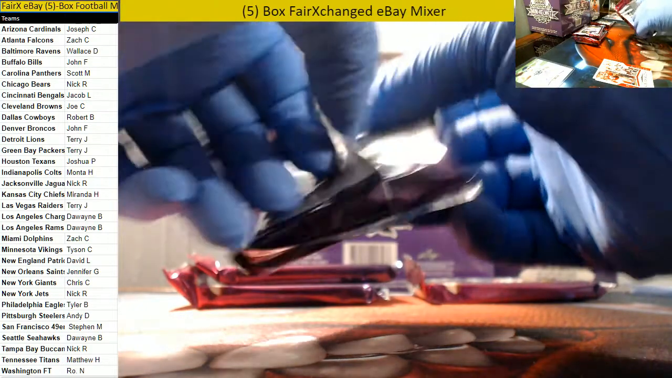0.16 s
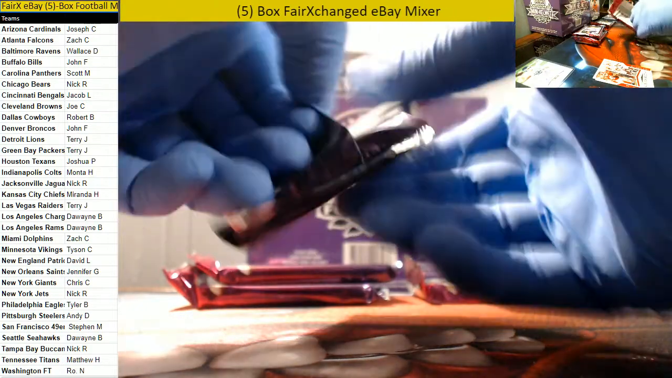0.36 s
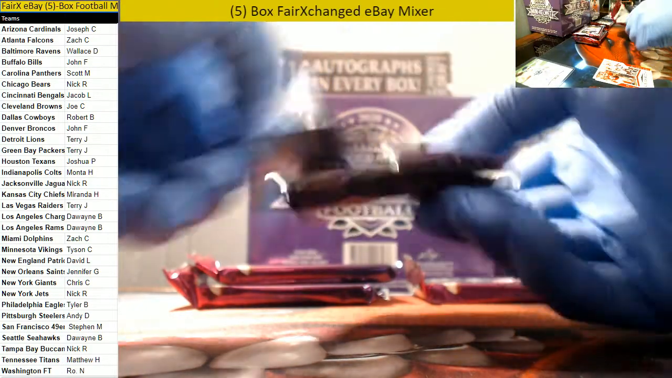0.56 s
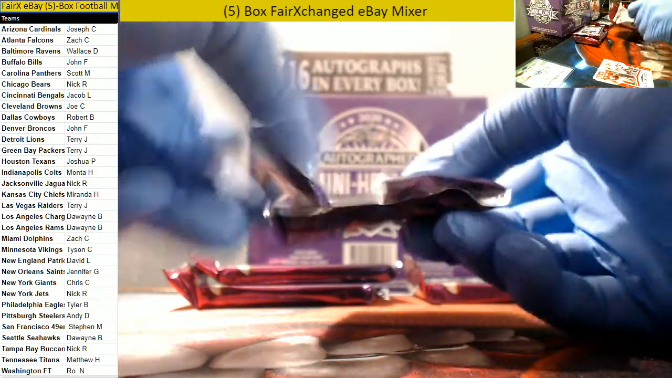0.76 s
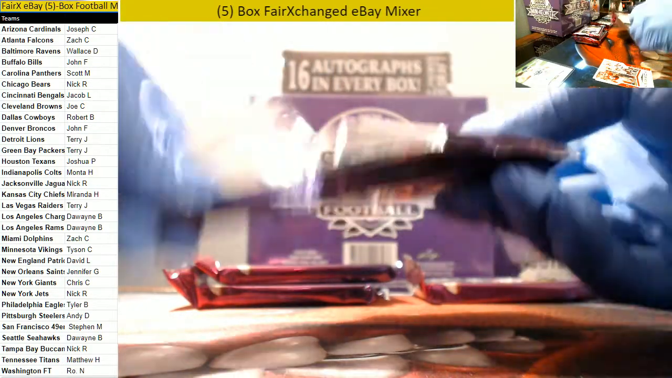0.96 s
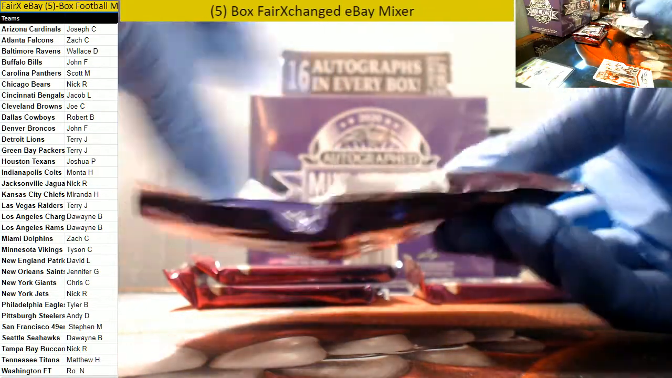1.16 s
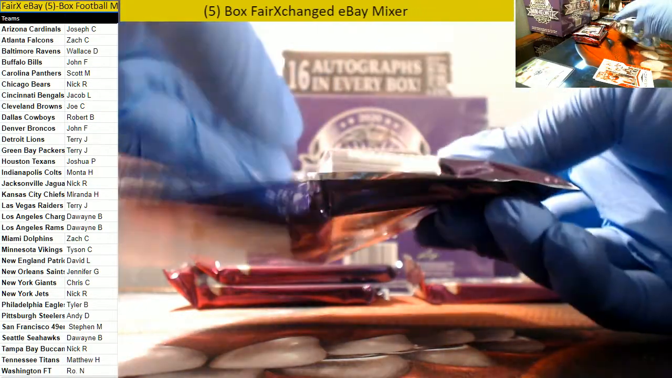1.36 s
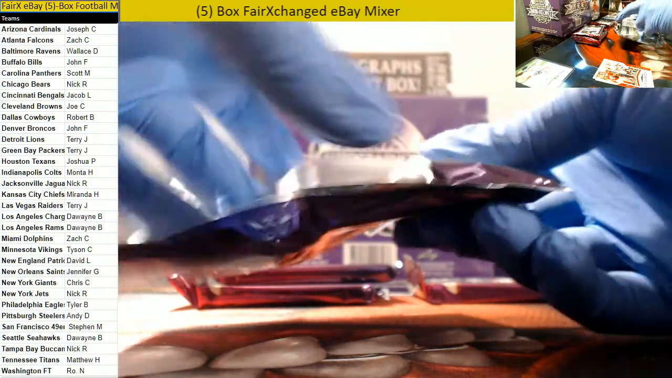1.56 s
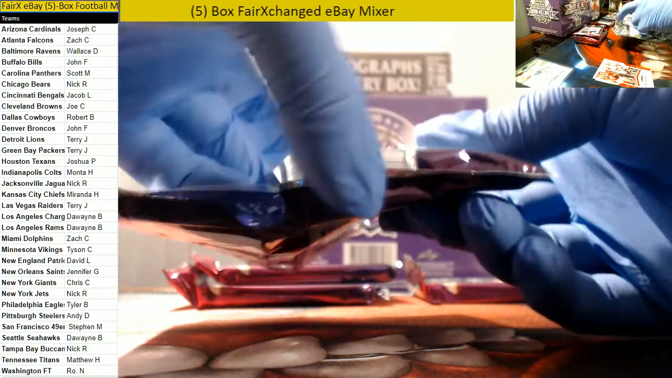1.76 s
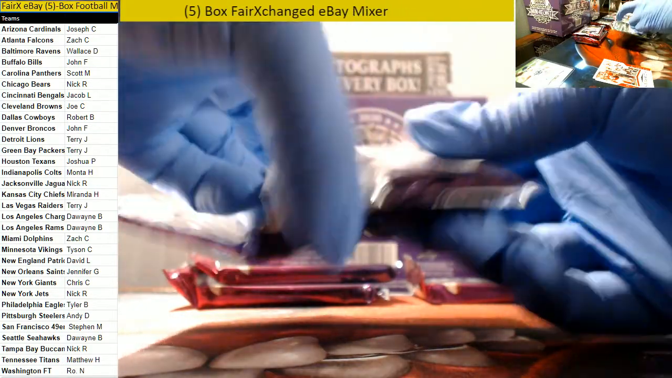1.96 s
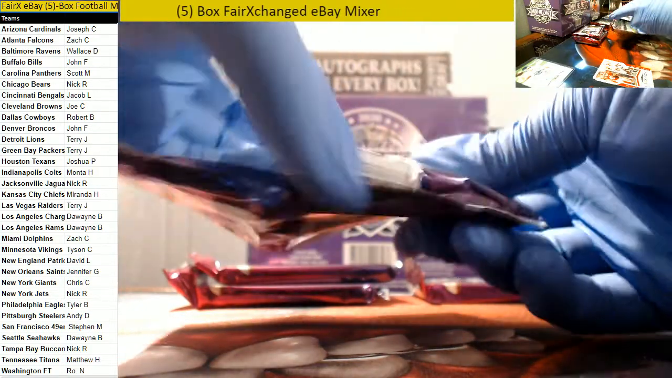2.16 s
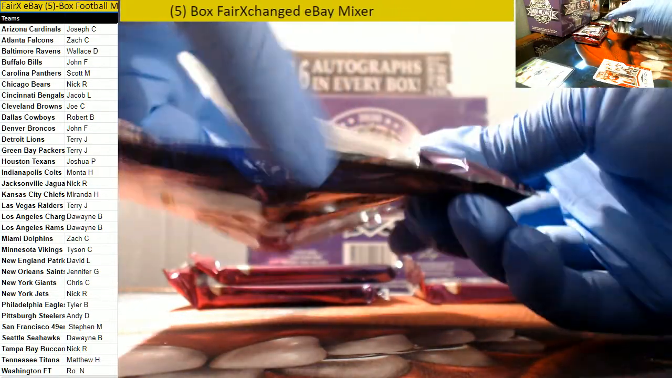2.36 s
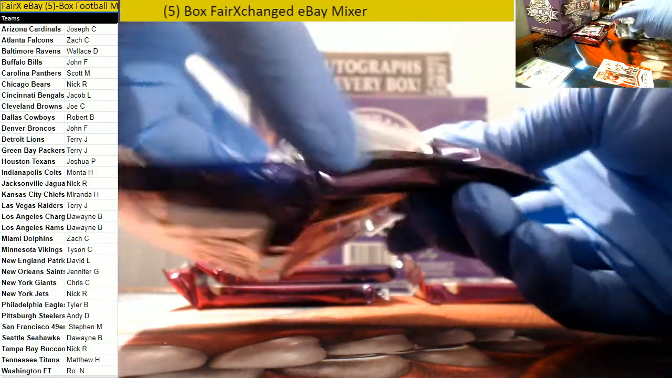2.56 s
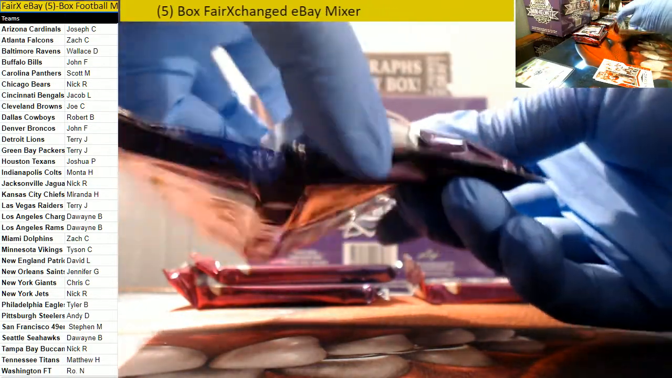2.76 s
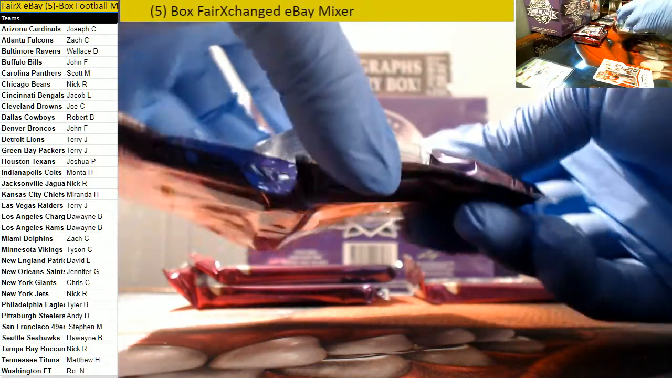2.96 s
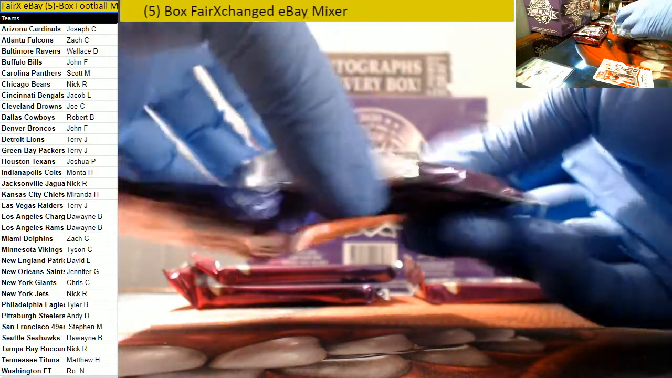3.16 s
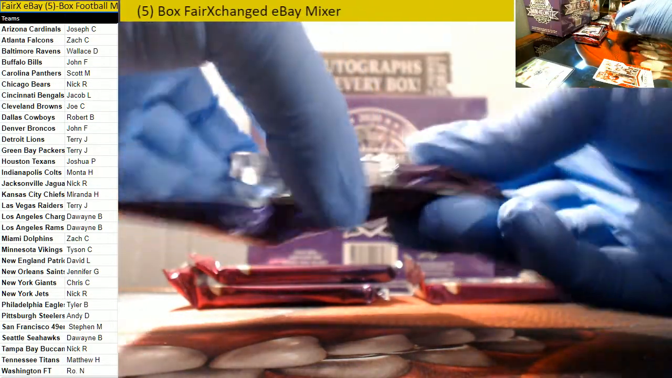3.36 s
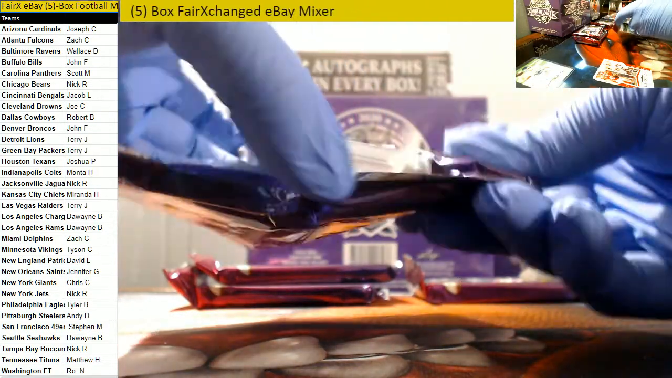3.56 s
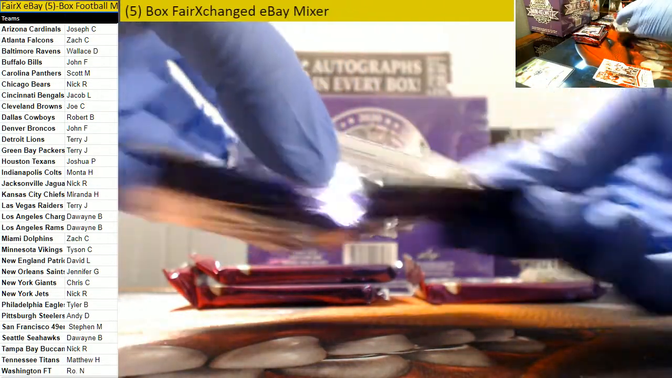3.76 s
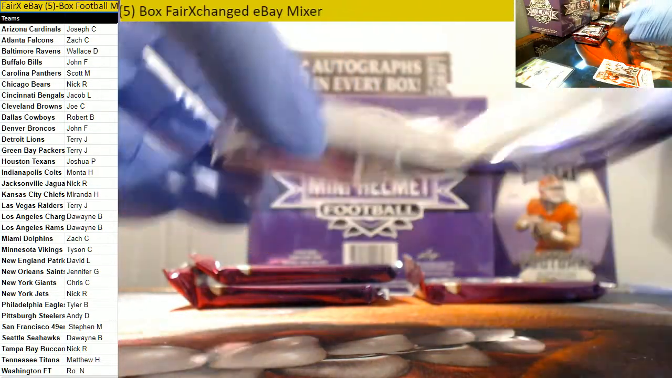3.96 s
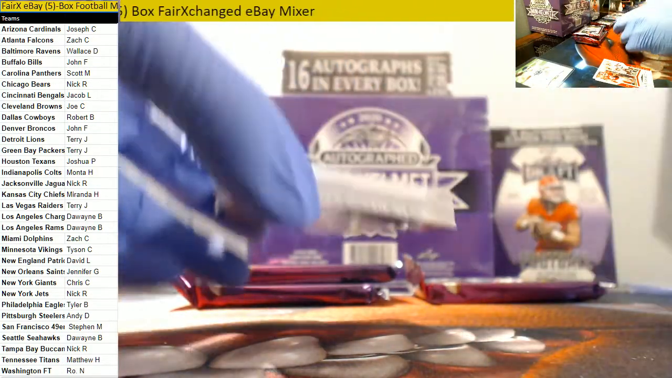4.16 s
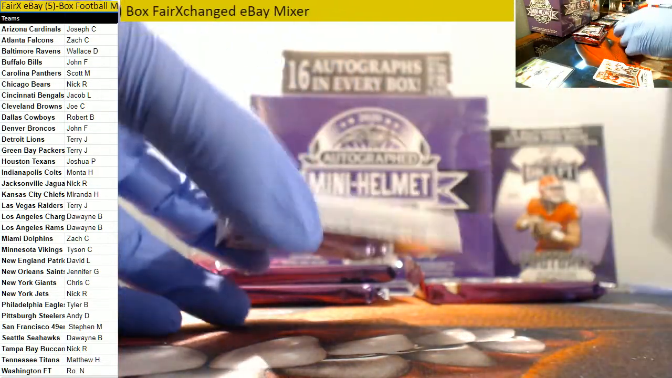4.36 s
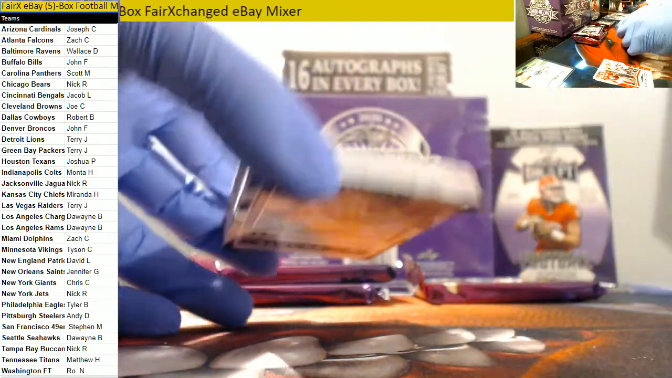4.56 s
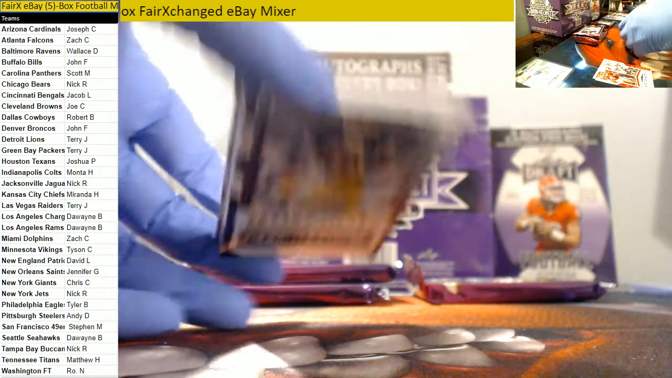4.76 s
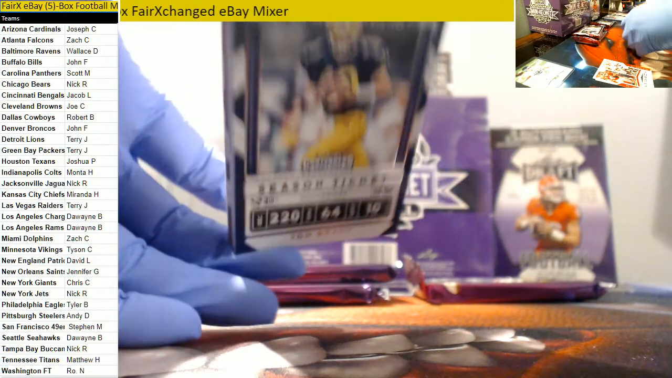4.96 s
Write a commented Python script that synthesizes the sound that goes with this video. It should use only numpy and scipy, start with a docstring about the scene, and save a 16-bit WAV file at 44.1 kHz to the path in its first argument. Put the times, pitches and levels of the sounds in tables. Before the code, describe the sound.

Gloved hands tear a foil trading card pack very close to a desk microphone. A few small snaps lead into a dense, loud rip within the first half second, then another sharp burst, overloading with low thumps. Afterwards come lighter scattered crinkles, a modest flurry past three seconds, a soft set-down thud, and near-quiet card movement. Small room, faint fan, sound leaning left and dull on top.

```python
"""Small foil snaps come first, as gloved hands tear open a card pack close to a desk microphone and work the cards out.
Creases snap and set short resonances ringing; foil and cards rub as a dense crackle of tiny noise grains.
Sliding cards hiss, fingers thud, the stretched wrapper twangs, and low thumps mark overloads of the left side.
A small room answers over a faint fan; the sound leans left, is dull above 8 kHz and clips on its loudest peaks."""
import sys
import numpy as np
from scipy import signal
from scipy.fft import rfft, irfft, next_fast_len
from scipy.io import wavfile
from scipy.ndimage import uniform_filter1d

SR = 44100
rng = np.random.default_rng(int(sys.argv[2]) if len(sys.argv) > 2 else 0)


def persist_wave(psi):
    """Save psi, clipped to +-1, as 16-bit WAV."""
    counts = np.round(np.clip(psi, -1, 1) * 32767).astype(np.int16)
    wavfile.write(sys.argv[1], SR, np.atleast_2d(counts).T)


N = 220708  # length in samples, about 5 s

# Levels are what each layer starts from; scene() adds a gain to some layers.
# clearest creases and card edges: start_s, crack level_db, crack pitch_hz, panel level_db
CREASE_SNAPS = [(.021, -30.5, 3350, -28.5), (.042, -29.5, 2070, -30.5), (.214, -28.5, 3320, -45),
                (.222, -24.5, 3870, -29), (0.254, -38, 2260, -38), (.271, -33, 3900, -40),
                (.275, -22.5, 4630, -33), (.291, -25, 4730, -21.5), (.295, -18.5, 4430, -37),
                (.304, -35, 2440, -18.5), (.314, -11.5, 3150, -17), (.324, -18, 4100, -16.5),
                (0.341, -25, 3150, -22), (.35, -12, 2130, -17), (.363, -18, 3240, -20.5),
                (0.368, -23, 2450, -12.5), (.381, -13.5, 2320, -18), (.394, -20.5, 3010, -12.5),
                (0.4, -27, 2730, -21), (0.407, -24, 3700, -17), (.427, -14, 3730, -16.5),
                (0.436, -21, 2820, -12.5), (0.461, -21, 3940, -15.5), (0.509, -29.5, 2390, -28),
                (0.521, -22, 4600, -36), (0.527, -30.5, 2860, -47), (.553, -29.5, 3700, -20.5),
                (0.679, -17.5, 3470, -22), (0.695, -25, 3640, -28), (.729, -24.5, 2650, -25),
                (.75, -27.5, 2040, -26), (0.759, -24.5, 3600, -24), (.77, -16, 3640, -20),
                (.776, -14, 3170, -37), (0.783, -21, 3570, -8), (0.842, -30.5, 3700, -47),
                (.888, -30.5, 3580, -37), (.899, -31, 3350, -34.5), (0.934, -28, 3540, -56),
                (.965, -26.5, 3660, -36), (.991, -31, 3650, -39), (1.039, -29.5, 4260, -32.5),
                (1.133, -33.5, 2650, -30), (1.149, -34.5, 3000, -54), (1.183, -27.5, 5000, -30),
                (1.206, -28.5, 4000, -32), (1.232, -25.5, 3770, -33), (1.259, -20.5, 3700, -24.5),
                (1.278, -17.5, 3300, -15.5), (1.509, -33.5, 2880, -35.5), (1.558, -25.5, 4800, -33.5),
                (1.604, -29, 3600, -30.5), (1.633, -55, 2400, -38), (1.689, -37, 2500, -42),
                (1.765, -32.5, 5470, -41.5), (1.777, -35.5, 2730, -44), (1.833, -31.5, 3960, -56),
                (1.991, -47, 4300, -51), (2.049, -42, 2740, -45), (2.113, -39, 2760, -35.5),
                (2.157, -34, 2930, -38), (2.17, -33.5, 2870, -36), (2.248, -49, 2720, -30.5),
                (2.269, -34, 3550, -47), (2.302, -19.5, 3370, -28), (2.344, -29, 3120, -34),
                (2.353, -21, 4000, -29), (2.455, -28.5, 3150, -27.5), (2.474, -31, 1980, -37.5),
                (2.582, -32, 3180, -35), (2.6, -27.5, 2520, -51), (2.669, -43.5, 2280, -37),
                (2.772, -35, 2780, -35), (2.824, -36, 2380, -35), (2.886, -38, 2180, -35),
                (2.908, -32.5, 2640, -39), (2.917, -26, 2620, -30), (3.05, -34.5, 2160, -43),
                (3.072, -23.5, 3300, -27), (3.133, -32, 3500, -41.5), (3.154, -36, 2480, -37),
                (3.187, -42, 3500, -39.5), (3.229, -38.5, 2230, -47), (3.282, -27, 2550, -28),
                (3.295, -40, 2900, -36.5), (3.316, -29, 3450, -28.5), (3.326, -34, 2850, -44),
                (3.335, -31, 3040, -50), (3.386, -25.5, 2310, -34), (3.396, -33, 3770, -43),
                (3.428, -22, 5200, -34.5), (3.478, -28.5, 2340, -39.5), (3.553, -32, 3300, -35),
                (3.574, -27, 3700, -52), (3.613, -28, 3180, -49), (3.624, -22.5, 3800, -42),
                (3.658, -19.5, 2740, -27), (3.681, -24, 3300, -33), (3.714, -37, 3540, -55),
                (3.962, -27.5, 3320, -28.5), (3.974, -34, 2480, -41.5), (4.045, -47, 2050, -46),
                (4.119, -40, 2740, -42), (4.143, -46, 2960, -39.5), (4.178, -41, 2850, -63),
                (4.206, -35, 3660, -45), (4.225, -26.5, 3000, -56), (4.364, -48.5, 2310, -55),
                (4.413, -39.5, 4170, -39.5), (4.751, -34, 3320, -37.5)]
# main tones of a crease: multiple of its pitch (ratio), level_db
CREASE_TONES = [(.6, -4.5), (.95, 2.5), (1.55, -2)]
# typical pitch of the panel beside a crease: time_s, pitch_hz
PANEL_PITCH = [(0, 822), (1.0, 930), (1.25, 736), (2.3, 616), (3.1, 740), (4.0, 860)]
PANEL_SCATTER = 0.12  # spread of pitch from panel to panel (log ratio)
# where the pack is held: time_s, lean to the right level_db
HOLD_LEAN = [(0, -3), (1.5, 0.5), (3.2, 1), (5, -3.5)]
LEAN_SCATTER_DB = 4.2  # spread from crease to crease
# time when only card edges tick: start_s, end_s
BARE_CARDS_TIME = (4.0, 4.5)
# tone of a ticking card edge: pitch_hz, level_db
CARD_EDGE_TONE = [(900, -2), (2000, -1.5), (3300, 3), (4600, 2.5), (6000, -8.5), (8000, -2.5)]
# small creases give way at random, louder under a stronger pull
CRINKLE_UNTIL_S = 3.75
CRINKLE_DB, CRINKLE_GROWS, CRINKLE_SCATTER_DB = -13.5, 0.7, 1.5  # at 0 dB effort; dB per dB of effort; spread
CRINKLE_HZ, CRINKLE_PANEL_DB = 3070, 3  # middle crack pitch; panel level against the crack

# pulls, tears and rubs: hardest_s, effort level_db, flutter over effort level_db, build_up_s, release_s
HAND_PULLS = [(.04, -39.5, 0.5, 0.15, 0.054), (0.394, -11, -1.5, .07, 0.094), (.582, -24, -6, .08, 0.022),
              (.69, -40.5, 3.5, 0.57, 0.12), (0.78, -9, -0.5, 0.062, 0.04), (.83, -40, 1, .1, 0.6),
              (1.286, -31.5, -3.5, 0.036, 0.088), (1.8, -47, 2, 0.5, 0.15), (2.038, -41.5, 5.5, 0.27, 0.13),
              (2.175, -48.5, 10, 0.035, 0.09), (2.291, -39, 5, 0.15, 0.058),
              (2.584, -44.5, 7.5, 0.02, 0.11), (2.68, -52.5, 10, .03, 0.11), (2.901, -47, 2, 0.5, 0.087),
              (3.325, -37.5, -2, 0.056, 0.35), (3.665, -28, -2.5, 0.21, 0.047),
              (3.841, -40.5, -1, 0.087, 0.035), (4.23, -41.5, -8.5, 0.033, 0.11),
              (4.65, -49, 7, 0.42, 0.13)]
SWELL_DB = 28.5  # effort gained over a build-up and lost over a release
# light grip under the pulls: time_s, effort level_db
LIGHT_GRIP = [(0, -51), (1.3, -59.5), (2.5, -58), (3.0, -64), (3.7, -44), (3.92, -68.5), (5, -76)]
SETTLE_DB, SETTLE_S = -16, 0.023  # foil settling after a snap: effort against the snap; release time
# shape of the fine crackle: pitch_hz, relative level_db (per Hz)
CRACKLE_TONE = [(530, -32), (900, -19), (1420, -6), (2350, -6.5), (2950, -9), (3360, -1), (6910, -10),
                (8000, -6), (10400, -48.5), (17600, -120)]
# shape of the loose sheet's flutter: pitch_hz, relative level_db (per Hz)
FLUTTER_TONE = [(60, -1), (170, -2), (280, 3), (420, -2.5), (700, 2), (1200, -3.5), (1600, -20),
                (3000, -21)]

# cards sliding over each other: fastest_s, half_length_s, level_db
CARD_SLIDES = [(0.572, 0.015, -24), (2.015, 0.079, -61), (2.756, 0.025, -44.5), (2.827, 0.025, -43.5),
               (3.37, 0.029, -43), (4.54, 0.12, -55.5), (4.641, 0.02, -51.5), (4.879, 0.069, -51.5)]
# shape of the glossy hiss: pitch_hz, relative level_db (per Hz)
GLOSS_TONE = [(700, -28), (1500, 1), (2300, -3), (3300, -2), (5200, 0), (7400, -2.5), (9000, -10.5)]
# fingers bumping and bending the pack: start_s, level_db, pitch_hz
FINGER_BUMPS = [(0.222, -38, 194), (0.285, -26.5, 220), (0.363, -19.5, 132), (.388, -17, 198),
                (.43, -32, 110), (0.584, -32, 125), (0.77, -29, 105), (1.19, -29.5, 142),
                (1.259, -25.5, 203), (2.154, -31.5, 146), (2.184, -36.5, 169), (2.273, -30.5, 215),
                (2.303, -30.5, 218), (2.677, -30.5, 128), (2.916, -29.5, 138), (3.313, -35, 146),
                (3.548, -36, 202), (3.662, -37, 124), (3.77, -27.5, 125), (4.539, -39.5, 160)]
# free rings of wrapper and desk: start_s, level_db, settled pitch_hz, time to fall 60 dB (fade_s)
FREE_RINGS = [(.453, -1, 720, 0.014), (.461, -18, 727, 0.11), (.77, -12.5, 351, .05),
              (1.279, -12, 722, 0.02), (1.294, -21, 593, 0.045), (2.352, -26, 432, 0.064),
              (3.773, -36.5, 32.6, 1), (3.774, -31, 260, 0.068), (3.772, -32, 417, 0.1),
              (3.772, -32, 626, 0.082), (3.772, -27.5, 840, .047), (3.964, -22, 813, 0.044)]
RING_SAG, SAG_S = 0.25, 0.0056  # share by which a ring starts sharp; time constant of its settling
# low thumps as the left side overloads on the loudest rips: middle_s, peak level_db on the left
OVERLOAD_THUMPS = [(0.368, -9), (0.406, -16.5), (0.438, -23.5), (0.771, -14), (0.782, -24)]

# how long the room's tail lasts: pitch_hz, time to fall 60 dB (fade_s)
ROOM_FADE = [(150, 0.15), (700, 0.39), (3000, 0.19), (8000, 0.07)]
# copies from desk, boxes and wall: delay_s, level_db
NEAR_ECHOES = [(.0031, -29.5), (.0049, -33), (.0097, -19.5), (0.0128, -32), (.05, -41)]
# shape of the steady air noise: pitch_hz, relative level_db (per Hz)
AIR_TONE = [(15, -39), (25, -2), (135, -7.5), (181, -5), (273, -5), (330, -11.5), (562, -12.5), (733, -15),
            (1220, -13), (1600, -23.5), (8000, -31.5), (10400, -68), (17600, -120)]
# hum lines of the fan: pitch_hz, level_db
FAN_HUM = [(53.5, -56), (124, -58), (657, -62.5)]

# right side against left: pitch_hz, level_db
RIGHT_LEVEL = [(60, -15), (900, -15), (1600, -13.5), (2800, -12), (5000, -11), (8000, -8)]
# likeness of left and right: pitch_hz, correlation (0 to 1)
SIDE_LIKENESS = [(60, 0.71), (500, 0.83), (1000, 0.4), (2000, 0.53), (4000, 0.15), (8000, 0.13)]
# microphone tone before the clipping: pitch_hz, level_db
MIC_TONE = [(100, 0), (270, 1), (450, 2.5), (650, 2), (1100, 0.5), (1450, 0), (2000, 2), (2950, -4),
            (3900, -4), (5200, -3), (6000, -3), (7000, -2)]
# microphone treble loss after the clipping: pitch_hz, level_db
MIC_TREBLE_LOSS = [(7000, 0), (7800, -9.5), (8550, -18.5), (9050, -29), (16000, -47.5)]
TOP_HZ = 16500  # nothing passes from here up


def snaps(creases, crack_db, panel_db, neighbour_db, lag):
    """A crease flips with a sharp crack, the panel beside it flaps, and two neighbouring creases tick around it."""
    foil, cards = np.zeros((2, N)), np.zeros((2, N))
    t = np.arange(SR // 25) / SR
    for s, db, hz, flap_db in creases:
        out = cards if BARE_CARDS_TIME[0] < s < BARE_CARDS_TIME[1] else foil
        flap_hz = at(PANEL_PITCH, s) * np.exp(PANEL_SCATTER * rng.standard_normal())
        lean_db = at(HOLD_LEAN, s) + LEAN_SCATTER_DB * rng.standard_normal()
        tick = amp(db + crack_db) * crack(t, hz, cycles=38.0, scatter_db=3)
        flap = amp(flap_db + panel_db) * burst(t, flap_hz, q=3.08, t60=0.014, kick=0.077)
        add(out, s, ports(tick + flap) * amp([[0], [lean_db]]))
        for when, colour, size in rng.standard_normal((2, 3)):
            pitch = min(hz * np.exp(0.22 * colour), 7500)
            level = amp(db + neighbour_db + 3.1 * size)
            small = level * burst(t, pitch, q=3.8, t60=.013, kick=0.085)
            right_db = along(RIGHT_LEVEL, pitch) + lean_db
            add(out, s + lag * (when + 0.62), small * amp([[0], [right_db]]))
    # stiff card rings in a narrower band than foil
    return foil + filtered(cards, lambda hz: amp(along(CARD_EDGE_TONE, hz)))


def crack(t, hz, cycles, scatter_db):
    """A buckling crease rings its facets at new strengths; high facets die sooner and stiff creases flip harder."""
    tones = 0
    for ratio, db in CREASE_TONES:
        pitch = min(hz * ratio * np.exp(0.14 * rng.standard_normal()), 7500)
        ring = burst(t, pitch, q=3.03, t60=cycles / pitch, kick=0.12 * (hz / 4000) ** 2)
        tones = tones + amp(db + rng.normal(0, scatter_db)) * ring
    return tones / np.linalg.norm(tones, axis=1, keepdims=True) * np.sqrt(.005 * SR)


def crinkles(effort_db, count):
    """Small creases give way at random moments; their rows have the same columns as CREASE_SNAPS."""
    times = CRINKLE_UNTIL_S * (np.arange(count) + rng.random(count)) / count
    size, colour = rng.standard_normal((count, 2)).T
    effort_now = effort_db[(times * SR).astype(int)]
    db = CRINKLE_DB + CRINKLE_GROWS * effort_now + CRINKLE_SCATTER_DB * size
    return list(zip(times, db, CRINKLE_HZ * np.exp(.22 * colour), db + CRINKLE_PANEL_DB))


def rubbing(friction_db, sheet_db, crackle_db, flutter_db, tick_db):
    """Tearing and sliding make a fine crackle with stray sharper ticks while the loose sheet flutters."""
    crackle = grains(CRACKLE_TONE, rate=430, spread_db=2.5, life=0.0012, bed=0.28)
    ticks = grains(CRACKLE_TONE, rate=130, spread_db=7, life=.0006, bed=0)
    flutter = grains(FLUTTER_TONE, rate=240, spread_db=6.0, life=0.00067, bed=0.64)
    friction = amp(friction_db + crackle_db) * (crackle + amp(tick_db) * ticks)
    return friction + amp(sheet_db + flutter_db) * flutter


def effort():
    """How hard the foil rubs and how much the sheet moves, in dB: light grip, pulls and settling after snaps."""
    # row 0 is the rubbing, row 1 the moving sheet
    power = amp(at(LIGHT_GRIP, np.arange(N) / SR)) ** 2 * np.ones((2, 1))
    for s, db, slack_db, build_s, release_s in HAND_PULLS:
        power += amp(db + swell(s, build_s, release_s)) ** 2 * amp([[0], [slack_db]]) ** 2
    settling = amp(SETTLE_DB - SWELL_DB * np.arange(SR // 4) / SR / SETTLE_S)
    for s, crack_db, _, panel_db in CREASE_SNAPS:
        add(power, s, (amp([[crack_db], [panel_db]]) * settling) ** 2)
    return 10 * np.log10(power)


def swell(s, build_s, release_s):
    """An effort that grows up to time s and then lets go, in dB against its peak."""
    t = np.arange(N) / SR - s
    return -SWELL_DB * np.maximum(-t / build_s, t / release_s)


def slides(level_db):
    """Glossy card faces hiss evenly, swelling with the speed of the stroke."""
    t = np.arange(N) / SR
    speed = sum(amp(db + level_db) * np.exp(-((t - s) / half) ** 2) for s, half, db in CARD_SLIDES)
    return speed * grains(GLOSS_TONE, rate=1500, spread_db=5.5, life=0.0007, bed=0.76)


def bumps(level_db):
    """Soft fingertips give dull, short thuds."""
    out, t = np.zeros((2, N)), np.arange(SR // 6) / SR
    for s, db, hz in FINGER_BUMPS:
        add(out, s, amp(db + level_db) * burst(t, hz, q=1.83, t60=0.068, kick=0.1))
    return filtered(out, lambda hz: 1 / (1 + (hz / 560) ** 4))


def rings():
    """The taut wrapper twangs and a hand set down shakes the desk; each ring starts sharp and sags in pitch."""
    out, t = np.zeros((2, N)), np.arange(SR) / SR
    sagging = t + RING_SAG * SAG_S * (1 - np.exp(-t / SAG_S))
    for s, db, hz, t60 in FREE_RINGS:
        phase = rng.uniform(0, 2 * np.pi, (2, 1))
        envelope = amp(db - 60 * t / t60) * (1 - np.exp(-t / 0.0018))
        add(out, s, envelope * np.sin(2 * np.pi * hz * sagging + phase))
    return out


def thumps(width):
    """Each overload gives one smooth low push, almost only on the left."""
    out, u = np.zeros((2, N)), np.linspace(-3, 3, round(6 * width * SR))
    for s, db in OVERLOAD_THUMPS:
        push = amp(db) * np.exp(-u ** 2)
        add(out, s - len(u) / 2 / SR, push * amp([[0], [-28]]))
    return out


def room(x, wet_db):
    """Near surfaces send back a few copies among a faint tail of noise that dies away."""
    hz, t, z = signal.stft(rng.standard_normal((2, SR // 2)), SR, nperseg=256)
    fade = amp(-60 * t / along(ROOM_FADE, hz)[:, None])
    tail = signal.istft(z * fade, SR, nperseg=256)[1]
    answer = amp(wet_db) * tail / np.linalg.norm(tail[0])
    for delay, db in NEAR_ECHOES:
        add(answer, delay, amp(db) * np.ones((2, 1)))
    return x + signal.fftconvolve(x, answer, axes=1)[:, :N]


def fan(air_db):
    """Steady air noise with a few faint hum lines."""
    t = np.arange(N) / SR
    air = unit(filtered(rng.standard_normal((2, N)), lambda hz: amp(along(AIR_TONE, hz))))
    hum = 0
    for hz, db in FAN_HUM:
        turns = hz * t + rng.random((2, 1))
        hum = hum + amp(db) * np.sqrt(2) * np.sin(2 * np.pi * turns)
    return amp(air_db) * air + hum


def burst(t, hz, q, t60, kick):
    """A push and a dying rattle through one resonance; as strong as 5 ms at rms 1."""
    push = rng.standard_normal((2, len(t))) * amp(-60 * t / t60) * (1 - np.exp(-t / 0.00091))
    push[:, round(.0004 * SR)] += kick * np.sqrt(t60 * SR)
    radius = np.exp(-np.pi * hz / q / SR)
    feedback = [1, -2 * radius * np.cos(2 * np.pi * hz / SR), radius ** 2]
    y = signal.lfilter([1, 0, -1], feedback, push)
    return y / np.linalg.norm(y, axis=1, keepdims=True) * np.sqrt(.005 * SR)


def grains(spectrum, rate, spread_db, life, bed):
    """Tiny slips of uneven size at random moments, over a bed of smooth friction; rms 1."""
    sizes = amp(spread_db * np.minimum(rng.standard_normal(N), 2))
    slips = (rng.random(N) < rate / SR) * sizes ** 2
    # each slip dies away over its life
    power = signal.lfilter([1], [1, -np.exp(-1 / (life * SR))], slips)
    noise = rng.standard_normal((2, N)) * np.sqrt(power / power.mean() + abs(bed))
    return unit(filtered(patchy(noise, depth_db=0.5), lambda hz: amp(along(spectrum, hz))))


def patchy(x, depth_db):
    """The folds keep changing shape, so patches of pitch and time grow louder and softer."""
    z = signal.stft(x, nperseg=256)[2]
    field = uniform_filter1d(rng.standard_normal(z.shape[1:]), size=5, axis=0)
    field = uniform_filter1d(field, size=7, axis=1)
    return signal.istft(z * amp(depth_db * unit(field)), nperseg=256)[1][:, :N]


def ports(pair):
    """The right side is weaker; it shares more of the bass with the left than of the high treble."""
    def shares(hz):
        alike = np.clip(along(SIDE_LIKENESS, hz), 0, 1)
        return amp(along(RIGHT_LEVEL, hz)) * np.array([alike, np.sqrt(1 - alike ** 2)])
    return np.array([pair[0], filtered(pair, shares).sum(axis=0)])


def amp(db):
    """Decibels to gain."""
    return 10 ** (np.asarray(db) / 20)


def unit(x):
    """Scale to rms 1."""
    return x / np.sqrt(np.mean(x ** 2) + 1e-20)


def along(points, hz):
    """(Hz, value) points read on a log axis."""
    f, v = np.transpose(points)
    return np.interp(np.log(hz + 1), np.log(f + 1), v)


def at(points, s):
    """(s, value) points read at time s."""
    return np.interp(s, *np.transpose(points))


def filtered(x, response):
    """Shape the spectrum of x by a response that depends on frequency."""
    size = next_fast_len(x.shape[-1] + 8192)  # spare room at the end
    spectrum = rfft(x, size) * response(np.fft.rfftfreq(size, 1 / SR))
    return irfft(spectrum, size)[..., :x.shape[-1]]


def add(track, s, sound):
    """Mix a sound in at time s."""
    start = max(round(s * SR), 0)
    part = track[:, start:start + sound.shape[-1]]
    part += sound[:, :part.shape[-1]]


def scene():
    """The wrapper in the hands, in a room with a fan, with the thumps of the overloaded left side."""
    friction_db, sheet_db = effort()
    rub = rubbing(friction_db, sheet_db, crackle_db=-1.0, flutter_db=-2.0, tick_db=-1.5)
    handling = rub + slides(level_db=3.5) + bumps(level_db=3.5) + rings()
    creases = CREASE_SNAPS + crinkles(friction_db, count=40)
    snapping = snaps(creases, crack_db=1.0, panel_db=-0.5, neighbour_db=-11.0, lag=0.0046)
    pack = snapping + ports(handling)
    return room(pack, wet_db=-17.0) + thumps(width=0.0017) + ports(fan(air_db=-49))


def record(dry):
    """The microphone clips the loudest peaks and passes little above 8 kHz; full scale trims what is left."""
    heard = np.clip(filtered(dry, lambda hz: amp(along(MIC_TONE, hz))), -1.1, 1.1)
    narrow = filtered(heard, lambda hz: amp(along(MIC_TREBLE_LOSS, hz)))
    return filtered(np.clip(narrow, -1, 1), lambda hz: hz < TOP_HZ)


dry = scene()
out = record(dry)
persist_wave(out)
```